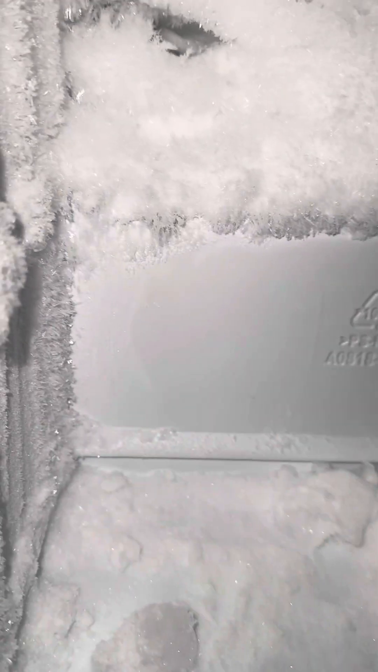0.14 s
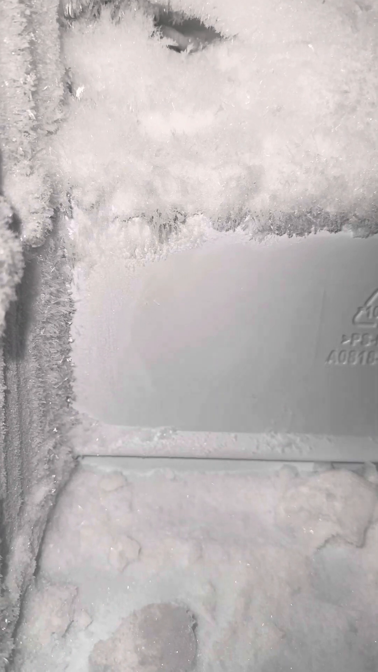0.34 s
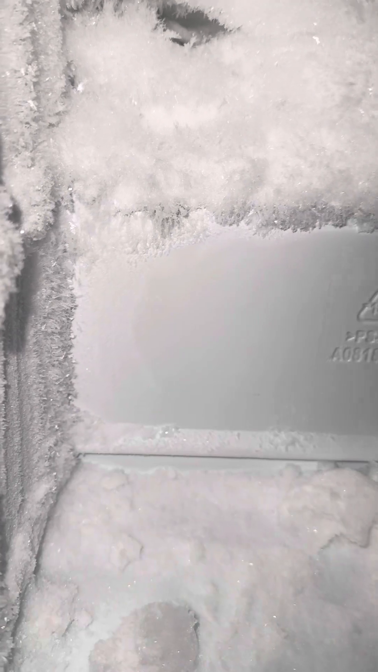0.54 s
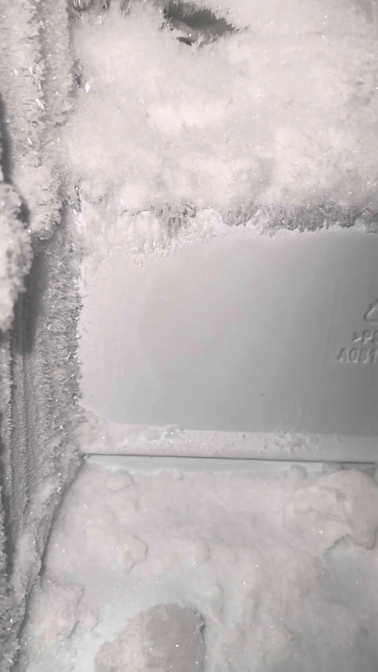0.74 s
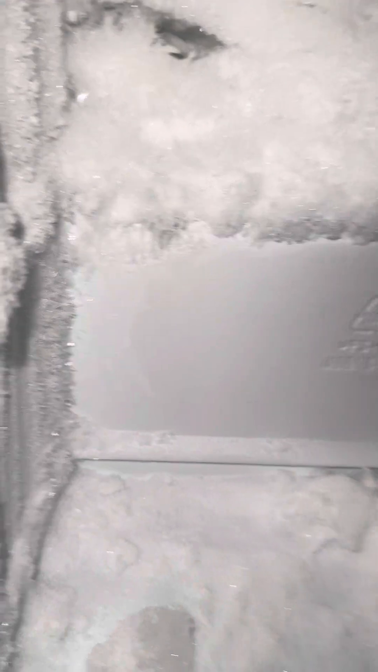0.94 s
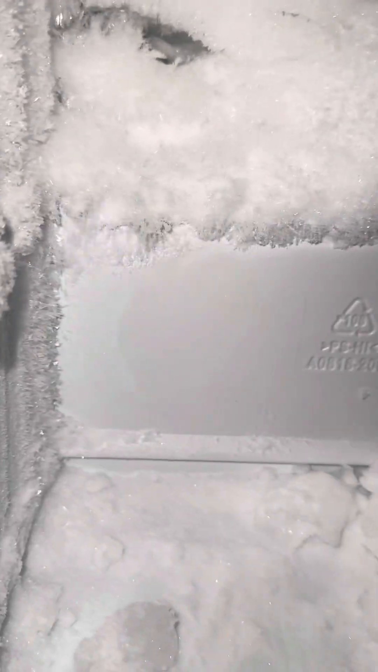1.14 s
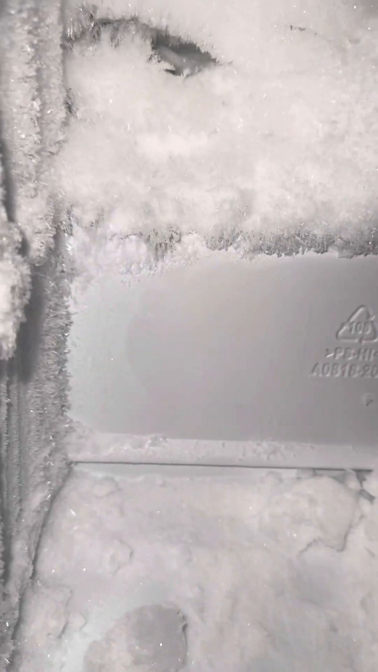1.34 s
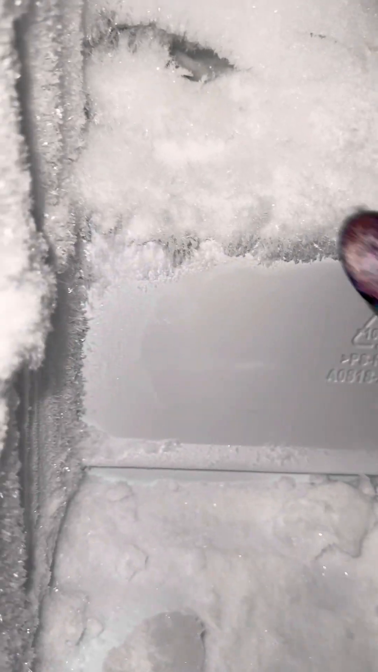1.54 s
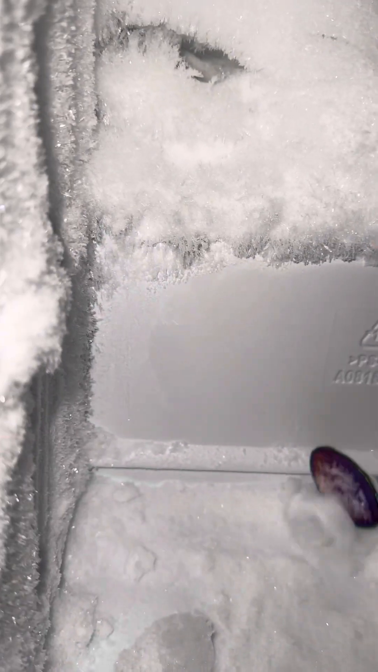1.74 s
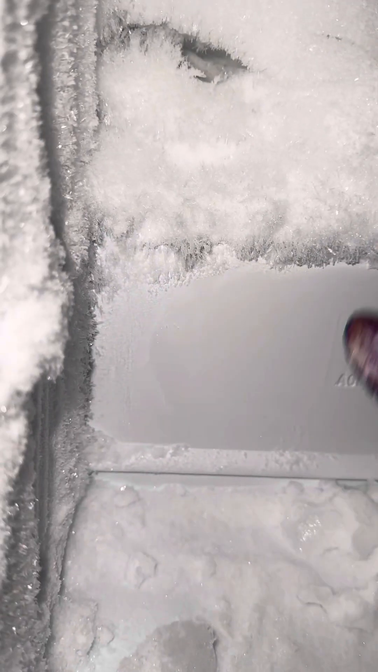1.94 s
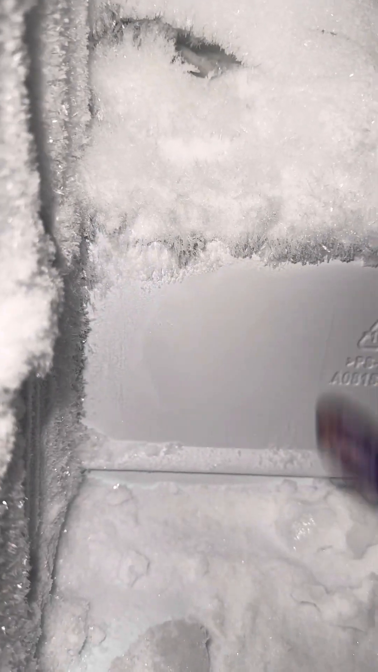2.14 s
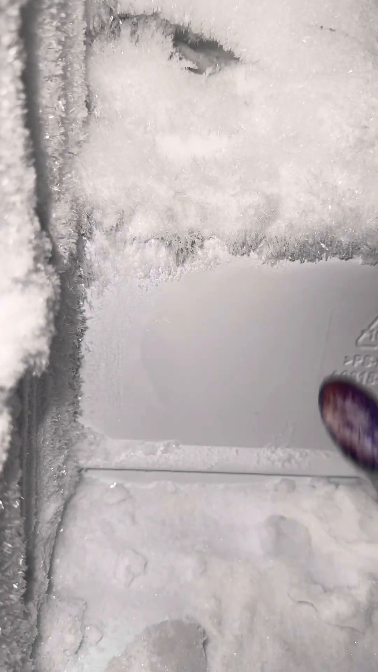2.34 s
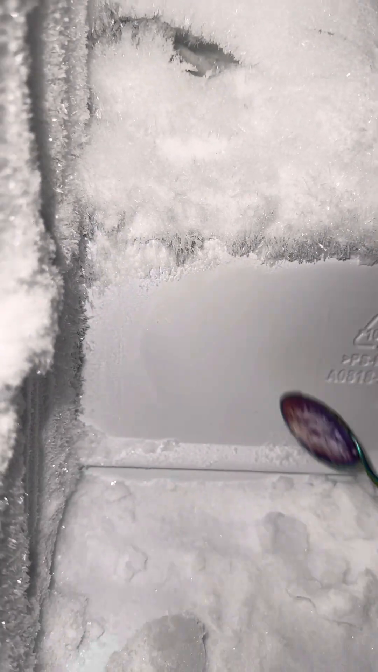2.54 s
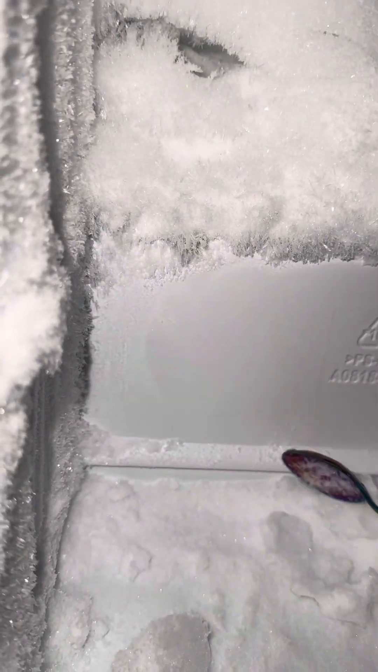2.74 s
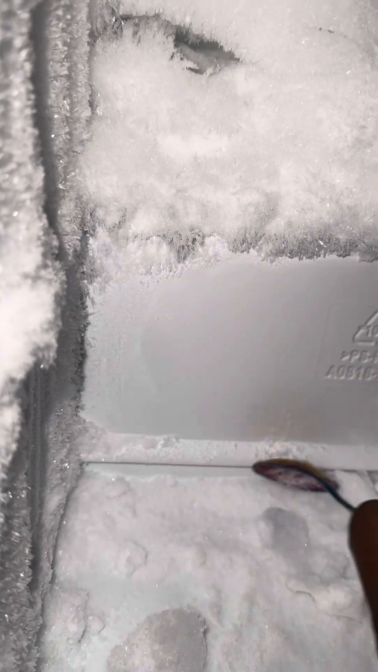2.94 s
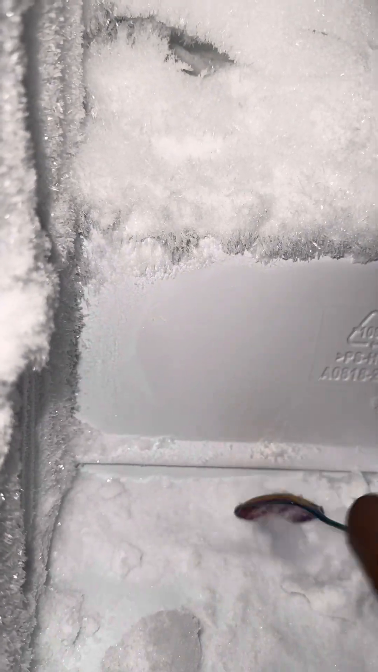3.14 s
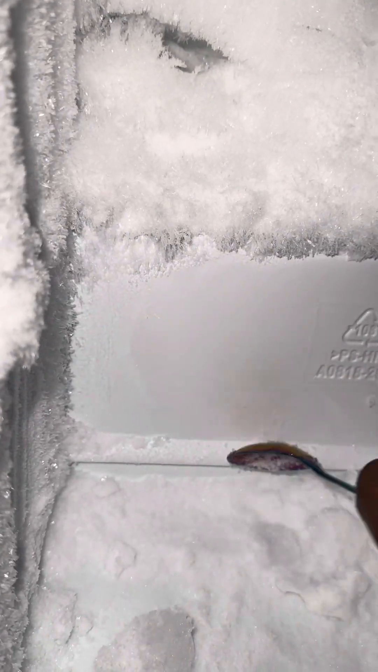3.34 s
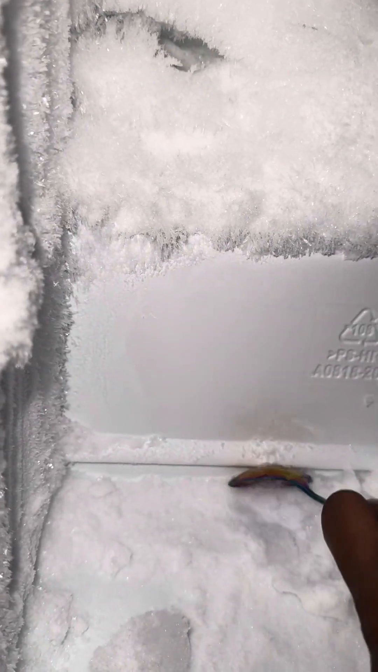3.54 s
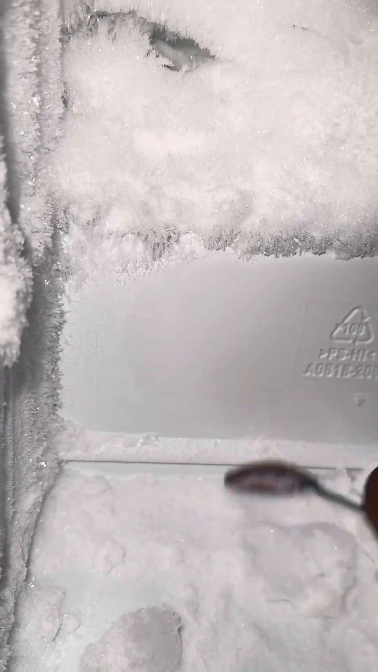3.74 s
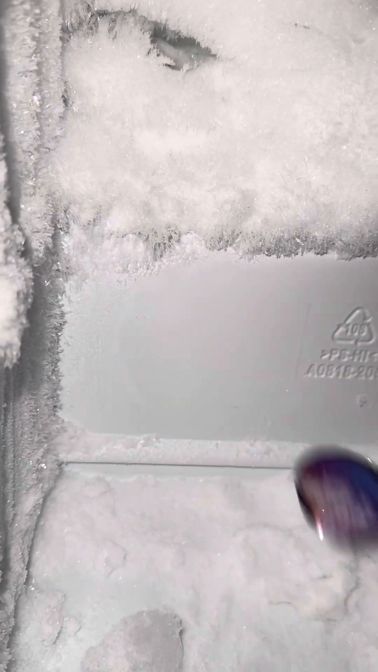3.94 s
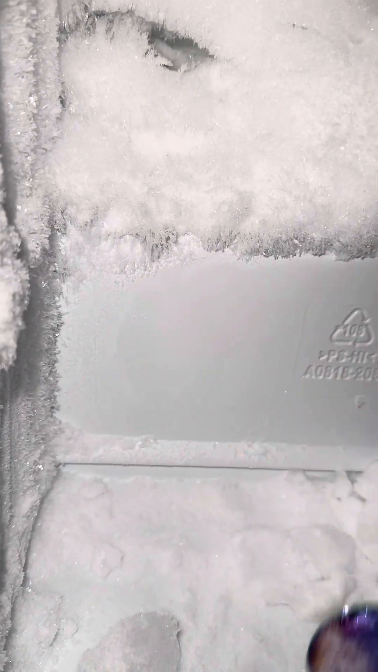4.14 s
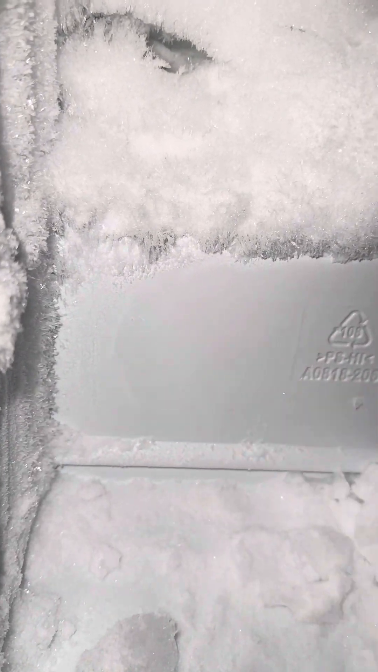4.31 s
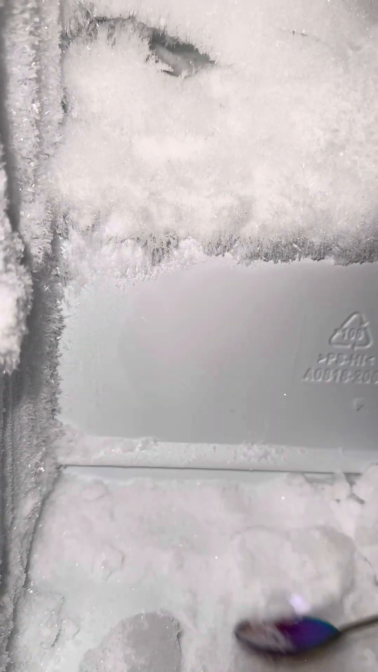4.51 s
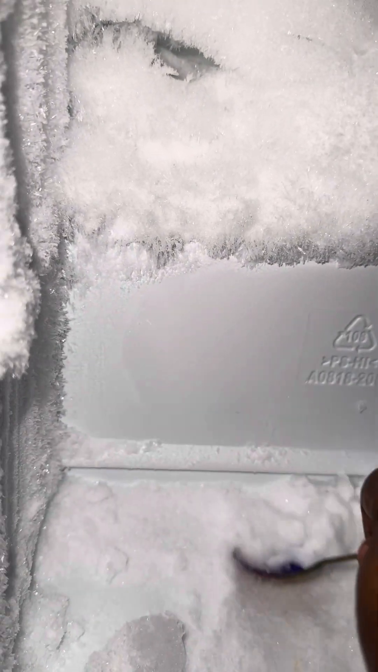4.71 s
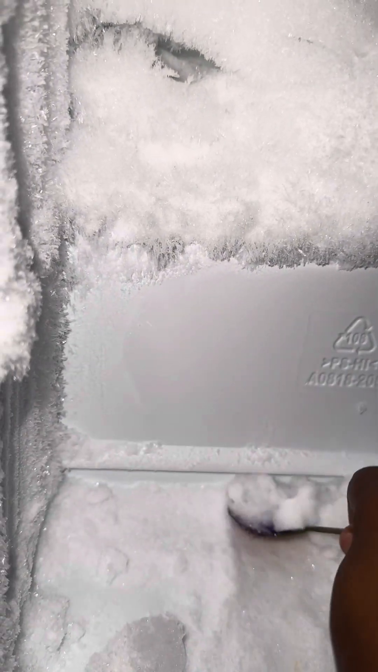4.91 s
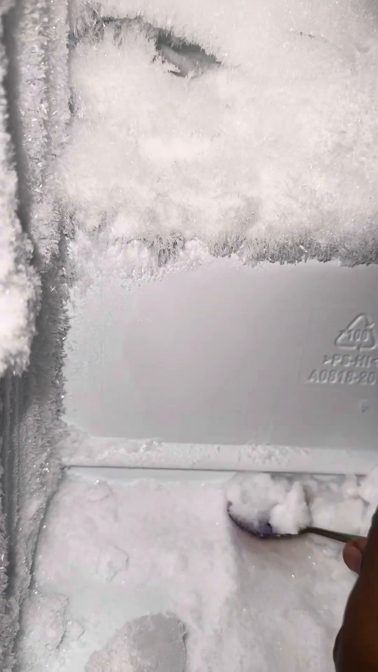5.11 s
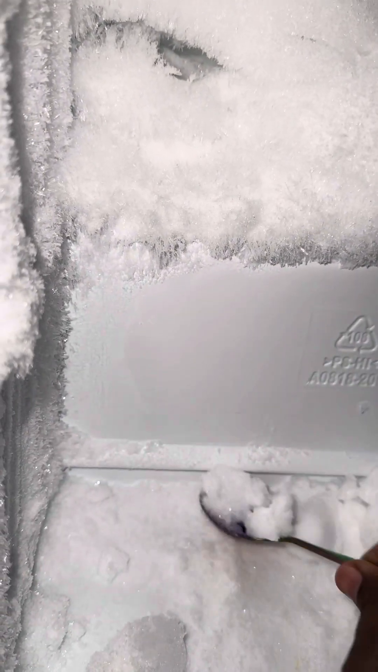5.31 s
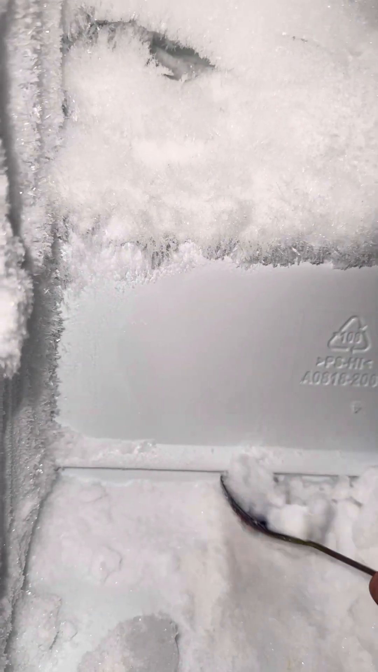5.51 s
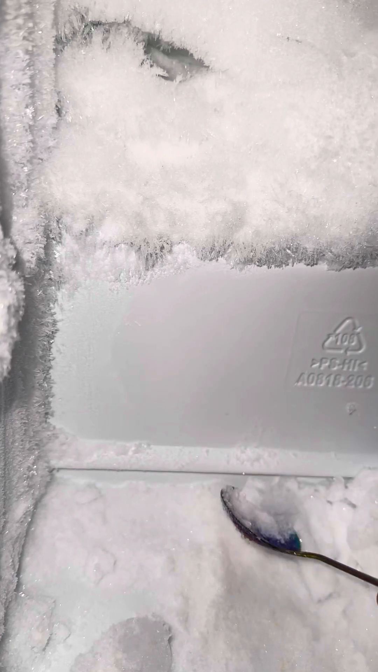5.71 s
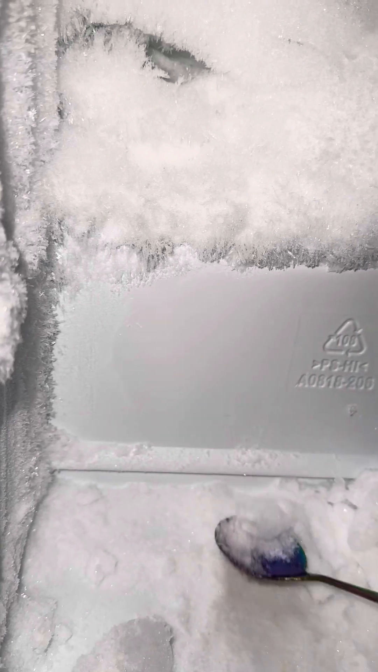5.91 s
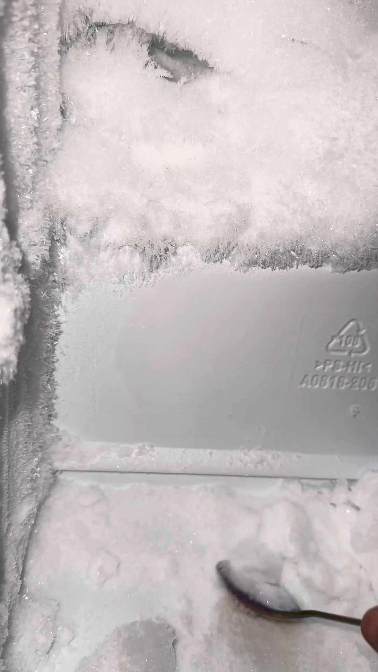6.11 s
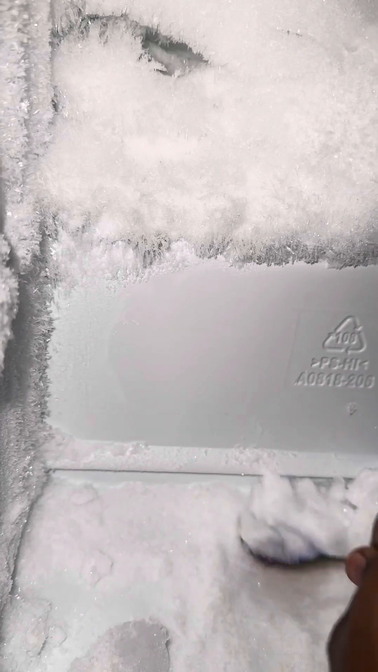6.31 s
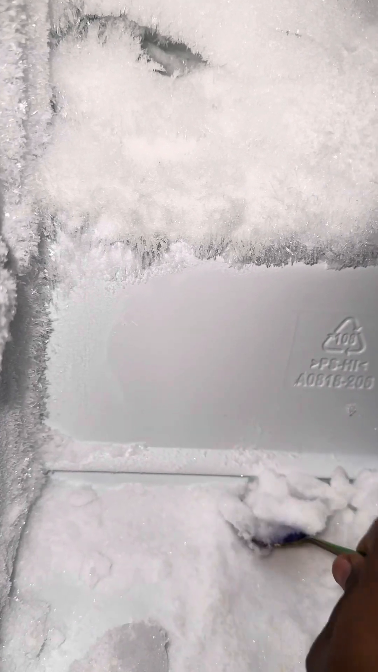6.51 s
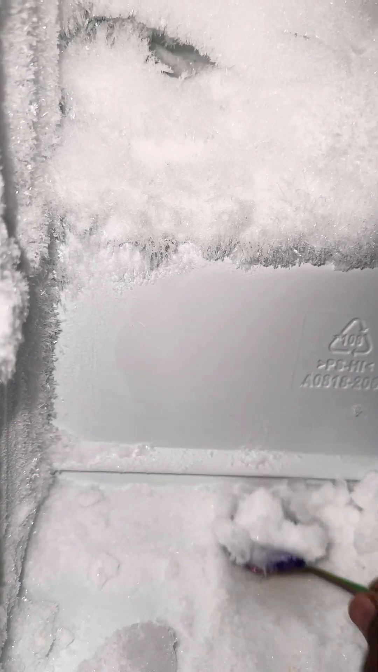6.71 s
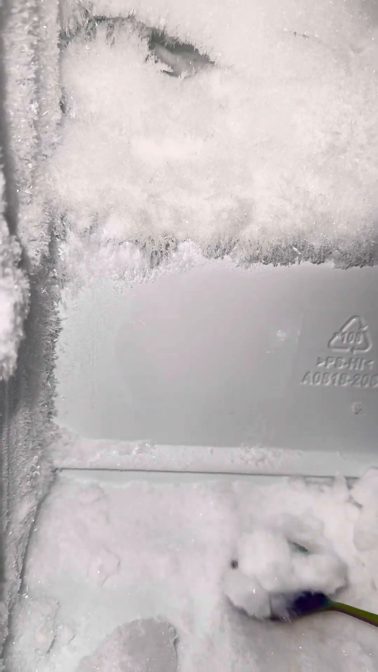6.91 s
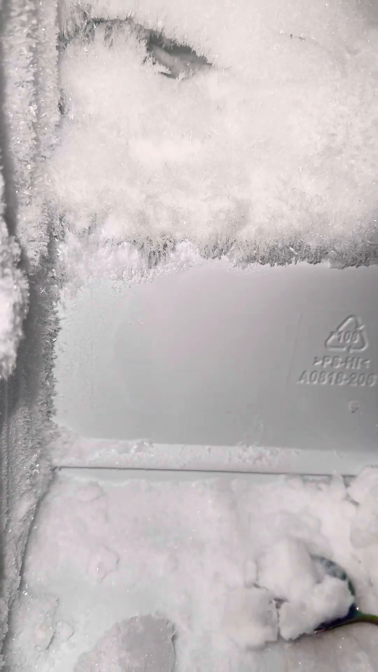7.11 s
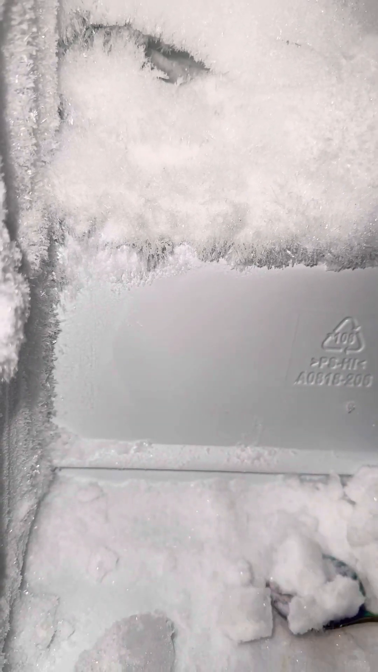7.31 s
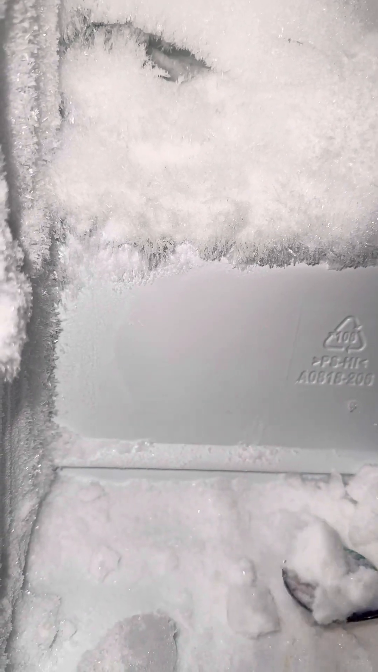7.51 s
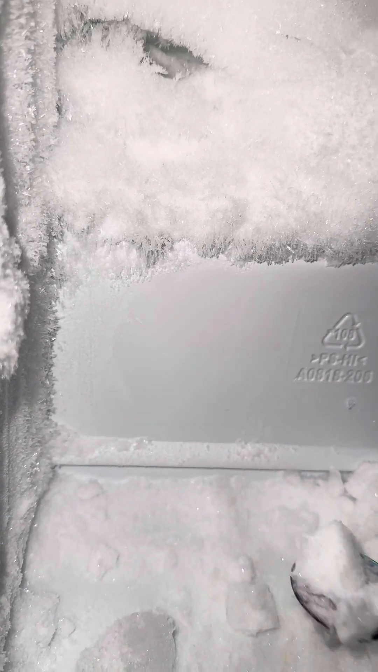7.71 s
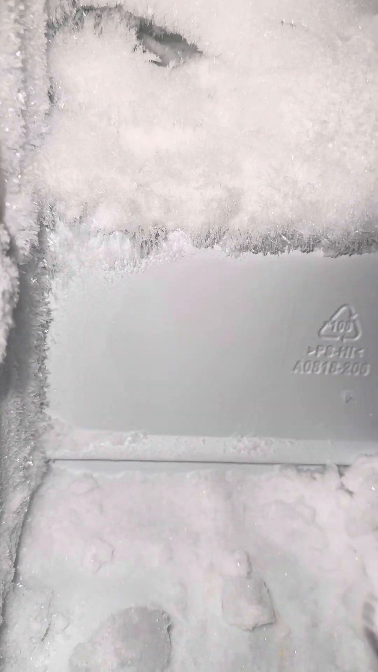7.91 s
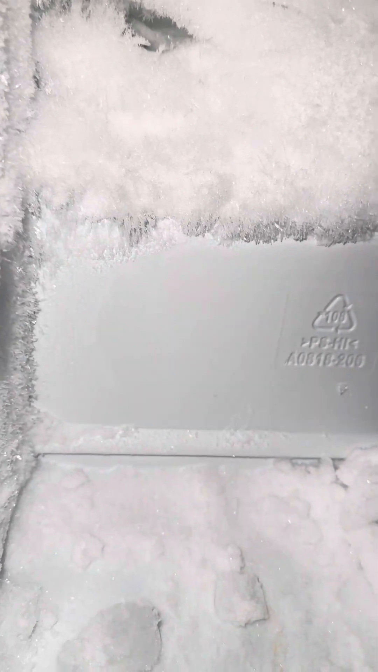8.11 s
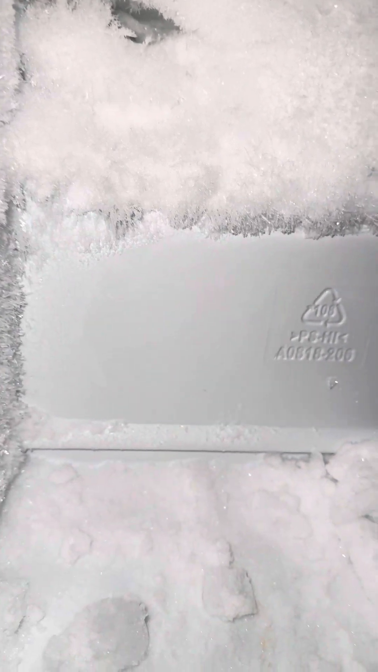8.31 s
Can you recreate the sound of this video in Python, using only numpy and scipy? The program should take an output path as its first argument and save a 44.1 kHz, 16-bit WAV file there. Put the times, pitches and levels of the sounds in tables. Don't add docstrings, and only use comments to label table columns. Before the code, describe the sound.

A metal spoon knocks hard twice on freezer frost, then rakes, stabs and scoops crunching ice over a low pulsing compressor hum.

```python
import sys
import numpy as np
from scipy import signal
from scipy.fft import rfft, irfft, next_fast_len
from scipy.io import wavfile
from scipy.ndimage import uniform_filter1d

SR = 44100
rng = np.random.default_rng(int(sys.argv[2]) if len(sys.argv) > 2 else 0)


def natural_amplitude(level_db):
    exponent = np.asarray(level_db, float) / 20
    return 10 ** exponent


def master_out(mix):
    frames = np.transpose(np.atleast_2d(mix))
    ceiling = np.clip(frames, -1, 1)
    pcm = np.round(ceiling * 32767).astype(np.int16)
    wavfile.write(sys.argv[1], SR, pcm)


N = 372777

# (multiple of shaft speed, level [dB rms])
ORDERS = [(1, -45), (3, -62), (6, -91.5), (7, -83.5), (8, -67), (9, -69), (10, -73), (12, -70.5), (14, -85),
          (16, -85.5), (33, -78)]
# (frequency [Hz], level [dB rms])
DOUBLES = [(118.26, -63.5), (119.04, -64), (120.0, -60)]
# (frequency [Hz], level [dB])
HISS_COLOUR = [(30, -15.5), (80, 22), (130, 15.5), (260, 7), (500, 4.5), (900, 0.5), (1600, -0.5),
               (2100, 3), (2900, -1), (3400, -7), (4200, -3), (6000, -7), (7000, -21), (9500, -34)]
# (frequency [Hz], level [dB])
HISS_PORTS = [(100, -18.5), (300, -6.5), (500, 0.5), (850, 6), (1300, -10), (1800, -19.5), (2700, -2.5),
              (3700, -8), (5000, -4.5), (6000, -8.5), (7000, -4), (9500, 2.5)]

# (frequency [Hz], level [dB])
PORTS = [(110, -37), (200, -28.5), (400, -8), (850, -14), (1300, -5.5), (1800, -16.5), (2700, 0),
         (3700, -9.5), (5100, 1.5), (6000, -5), (7500, -2.5), (10000, 3), (15000, 5)]
# (frequency [Hz], level [dB])
CENTRE_TREBLE = [(8000, -1.5), (9400, -2), (11500, -11.5), (13400, -6), (14500, 5)]
# (frequency [Hz], turn [rad])
TURN = [(300, -2.3), (650, -3.), (1000, -2.6), (1450, -3.6), (2000, -.6), (2700, -.6), (3500, -2.2),
        (5500, -1.8), (7000, -1.55)]
# (frequency [Hz], share [0-1])
APART = [(300, .8), (1000, 0.99), (1500, 0.87), (3500, .9), (5800, .92), (7000, .35), (9500, 0.39),
         (11000, 0.83)]

# (time [s], peak [dB], ring [Hz], length [ms])
TICKS = [(0.258, -43.5, 4100, 2.3), (0.284, -47.5, 2680, 4), (.352, -49, 2510, 1.4),
         (0.821, -48, 4090, 1.7), (1.163, -46, 4770, 1.5), (1.62, -42.5, 2090, 1.9),
         (8.157, -55, 1800, 2.6), (8.047, -43, 4100, 4), (8.136, -54.5, 4080, 1.7), (8.191, -53, 5650, 2.5),
         (1.093, -27, 4500, 2.5)]
# (frequency [Hz], t60 [s])
KITCHEN_DECAY = [(1000, .3), (3200, 0.42), (6000, 0.22), (12000, 0.17)]
# (time [s], peak [dB], length [ms])
LATCH = [
    (1.082, -40, 2.4),
    (1.0898, -27, 1.3),
    (1.0945, -16.5, 0.69),
    (1.0985, -22.5, 1),
]
# (frequency [Hz], width [Hz], level [dB])
LATCH_MODES = [(1500, 180, -14), (2120, 210, -11), (3200, 160, -11), (3570, 270, 4), (3880, 270, 2),
               (4700, 210, -1), (5700, 230, -1), (5730, 270, -12), (7770, 360, -13),
               (13500, 150, -10), (15100, 500, -14)]
# (time [s], peak [dB], length [ms])
CATCH = [
    (8.0549, -20.5, 0.23),
    (8.058, -34, 1.2),
]
# (frequency [Hz], width [Hz], level [dB])
CATCH_MODES = [(1350, 89, -13), (1670, 140, -7), (2090, 200, -2.5), (2720, 97, 1.5), (3280, 150, -8),
               (3800, 430, -3.5), (4730, 140, -21.5), (5630, 140, -4.5), (7400, 270, -32)]

# (frequency [Hz], level [dB])
FROST = [(65, -51), (110, -16), (194, -2.5), (301, -14.5), (601, -4.5), (1180, -7), (1790, -11), (2700, -7),
         (3200, -10.5), (5210, -13), (7920, -10), (11000, -17), (15600, -23.5), (16100, -83)]
# (frequency [Hz], width [Hz], level [dB])
BODY = [(214, 79, -8), (383, 22, 5), (563, 56, 2.5), (680, 68, 3), (900, 30, -9), (1200, 76, 4),
        (1520, 240, 3.5), (2090, 90, -0.5), (2300, 83, 6), (2674, 40, 3), (3720, 97, -2), (4260, 62, 1.5),
        (6530, 490, -7.5)]
# (frequency [Hz], level [dB], t60 [s])
PLATE = [(212.4, 13.5, 0.031), (280, 5, 0.035), (151, -9.5, 0.048), (400, -7, 0.051), (94, -13.5, 0.087),
         (189.7, -11.5, 0.12)]
# (frequency [Hz], t60 [s])
CABINET_DECAY = [(150, 0.17), (500, 0.32), (2000, 0.16), (8000, 0.14)]

# (time [s], peak [dB], ring [Hz], fizz [dB re peak])
CRACKS = [(2.935, -25.5, 2070, -32), (2.959, -20, 680, -7), (3.093, -21, 650, -1), (5.074, -36, 2600, -7),
          (4.298, -36.5, 600, 14), (4.341, -20, 1240, -11), (5.288, -46, 2900, -2),
          (4.6855, -18.5, 1280, -16), (4.743, -25, 1240, -2), (4.78, -18.5, 2400, -7),
          (5.165, -34.5, 700, -22), (5.369, -42.5, 675, -0.5), (5.465, -44, 484, 1),
          (5.030, -38, 2300, -15), (5.596, -31.5, 726, -27), (5.741, -41, 540, -23),
          (5.971, -29.5, 950, -22), (6.218, -29, 507, -2), (6.656, -36, 1290, -1), (6.722, -31, 1300, -5),
          (5.099, -41, 2770, -11), (6.705, -41.5, 1270, 3), (6.749, -45, 1200, 3), (5.266, -44.5, 900, 2.5),
          (7.091, -42.5, 700, 0.5), (7.297, -39, 690, -11), (7.349, -43, 750, -28)]
# (time [s], peak [dB], ring [Hz], fizz [dB re peak], thud [dB re peak])
KNOCKS = [(.29, -55.5, 394, -27, 13), (1.706, -37, 1000, -17.5, -21), (1.7137, -30.5, 1514, 5.5, -36),
          (1.7161, -4.5, 1170, -22, -18), (1.7174, -9, 520, -30.5, -29.5), (1.7205, -20, 1450, -22, 16.5),
          (1.738, -38, 1500, 1.5, -27), (1.816, -28.5, 1248, -6.5, -7), (2.155, -37, 2444, -3.5, -22),
          (2.1594, -8, 1220, -4, -21), (2.1626, -12, 703, -20.5, -8), (2.171, -26.5, 557, -30, 6),
          (2.212, -28.5, 1180, -13, -14), (4.926, -17, 430, -16, -12), (3.1185, -8, 2100, -14, -14.5),
          (3.564, -18.5, 666, 2, -16.5), (6.977, -32, 2200, -4.5, 0.1), (6.0165, -20, 535, -12, 1),
          (6.0727, -24.5, 527, 1, 1.5)]
# (time [s], peak [dB], ring [Hz], fizz [dB re peak])
LUMPS = [(0.844, -42, 533, -33), (2.299, -30, 2300, -3), (2.352, -40.5, 2390, -10), (2.766, -40, 1200, -1),
         (2.807, -30, 1350, -13), (3.648, -14.5, 1260, -14), (4.109, -47, 1670, -39),
         (4.182, -46, 1280, -13), (7.487, -39.5, 706, -18), (5.14, -39, 672, -24), (5.525, -32, 564, -7),
         (5.625, -32.5, 1230, 2.5), (5.84, -36, 1240, -19), (5.944, -34, 600, -17), (6.78, -48, 587, 12),
         (6.881, -43, 616, -23), (7.426, -35, 900, -6), (7.462, -38, 400, -6)]
# (time [s], peak [dB], ring [Hz], fizz [dB re peak], length [ms])
CLUMPS = [(2.846, -33.5, 1450, -17, 3), (2.888, -42, 860, -10, 4.6), (2.914, -37, 1410, -4, 3.1),
          (2.96, -28, 2400, -12, 5.8), (2.993, -23.5, 615, -19, 2.1), (3.529, -37, 2020, -18, 2.9),
          (3.483, -17.5, 634, -27, 2.3), (3.563, -17.5, 2260, -19, 3.6), (3.59, -21, 1180, -1, 1.8),
          (3.629, -20, 1250, -7, 1.7), (3.657, -17, 710, -18, 3.1), (4.364, -26, 1120, -14, 1.2),
          (4.431, -34, 1920, -10, 2.9), (4.452, -30, 1570, -5, 3.8), (4.468, -25, 2180, -1, 1.5),
          (4.532, -27.5, 2180, 3, 2.5), (4.617, -21.5, 1600, -4, 2.9), (4.662, -21, 1590, -4, 1.9),
          (4.671, -21, 1630, -2, 0.95), (4.708, -30, 696, -12, 2.3), (4.788, -30, 2980, -12, 1.3),
          (4.831, -19.5, 1180, -19, 2.8),
          (6.262, -25, 590, -0.5, 5.2), (6.304, -24, 1160, -5, 2.3), (6.343, -20, 1270, -12, 5.4),
               (6.362, -13.5, 1300, -9, 1.7), (6.345, -20.5, 715, -25, 6.8), (6.413, -19.5, 2650, -12, 2.7),
               (6.468, -26, 2240, -14, 3.7), (6.036, -38, 1700, 7, 1.5), (5.565, -40.5, 2400, 4.5, 0.72),
               (5.817, -51, 1600, -11, 2.1), (7.118, -37.5, 2040, 1, 1.8), (7.9, -45, 2500, -12, 1.6),
               (4.4, -39, 2900, -10, 3), (5.1, -47, 1800, 6, 5.2), (6.011, -21, 1800, 1.5, 4.3),
               (6.064, -24.5, 1930, 0, 4), (6.505, -28, 610, -26, 5), (6.979, -33, 450, -27, 2.4),
               (7.275, -47, 700, -20, 9.5), (4.7, -36, 2400, -6, 3.8), (6.742, -37, 2700, 3, 1.6),
               (6.782, -40, 1800, -5, 0.75), (6.325, -16, 1200, -10, 3.1), (4.598, -18, 1500, -6, 2.5)]
# (time [s], peak [dB], ring [Hz], fizz [dB re peak])
SNAPS = [(1.717, -24, 2300, 7), (2.1588, -20.5, 2700, 1.5), (2.1612, -10, 1000, -1.5),
         (2.167, -7.5, 2240, 1), (1.8168, -23, 2200, -5), (3.83, -53, 3000, -22.5),
         (3.9065, -50.5, 3600, -16.5), (3.94, -50, 3300, -17), (4.039, -50, 2200, -19),
         (4.072, -54, 1800, -22), (4.13, -43.5, 3000, -22), (4.2035, -45, 4000, -22),
         (2.63, -51, 3400, -24), (2.5, -49.5, 1114, -10)]

# (start [s], rise [s], hold [s], 20 dB fade [s], crunch [dB])
REACH = [
    (1.01, 0.021, 0.041, .015, -79.5),
    (1.1, .01, 0.029, 0.063, -70),
]
# (start [s], rise [s], hold [s], 20 dB fade [s], crunch [dB])
SPRAY = [
    (1.722, 0.00088, .001, 0.0523, -17),
    (1.73, 0.0068, 0.0009, 0.28, -43),
    (1.816, .004, 0.0012, 0.04, -39),
]
# (start [s], rise [s], hold [s], 20 dB fade [s], crunch [dB])
BOUNCE = [
    (2.168, 0.00072, 0.00091, 0.0077, -16),
    (2.172, 0.0041, 0.0011, 0.091, -28),
    (2.26, 0.037, .001, 0.043, -42.5),
    (2.31, 0.0059, .001, 0.14, -51),
]
# (start [s], rise [s], hold [s], 20 dB fade [s], crunch [dB])
NUDGE = [
    (2.755, 0.063, .001, 0.087, -40),
    (2.8, 0.026, 0.14, 0.029, -42.5),
]
# (start [s], rise [s], hold [s], 20 dB fade [s], crunch [dB])
RAKE = [
    (2.95, 0.013, .001, 0.066, -18),
    (3.015, 0.029, 0.027, 0.01, -28.5),
    (3.082, 0.018, 0.0097, 0.03, -19.5),
    (3.122, 0.0056, 0.023, 0.02, -22),
    (3.17, 0.025, .001, 0.14, -45),
]
# (start [s], rise [s], hold [s], 20 dB fade [s], crunch [dB])
STAB = [
    (3.411, 0.0028, 0.034, 0.055, -42),
    (3.44, 0.047, 0.011, 0.0089, -22.5),
    (3.51, 0.01, 0.046, 0.034, -44),
    (3.558, 0.0054, 0.09, 0.037, -19.5),
    (3.68, 0.035, .001, 0.23, -50.5),
]
# (start [s], rise [s], hold [s], 20 dB fade [s], crunch [dB])
SCOOP = [(4.288, 0.015, 0.031, 0.097, -32.5), (4.31, 0.038, 0.013, 0.059, -27),
         (4.38, 0.045, 0.073, 0.05, -34), (4.44, 0.022, 0.036, 0.1, -31),
         (4.525, 0.016, 0.032, 0.056, -28.5), (4.565, 0.027, 0.035, 0.095, -24.5),
         (4.65, 0.017, 0.016, 0.036, -34.5), (4.685, 0.0027, 0.011, 0.079, -28.5),
         (4.742, .006, 0.022, 0.044, -30.5), (4.775, 0.0076, 0.0089, 0.031, -21.5),
         (4.805, 0.0077, 0.041, 0.085, -30.5), (4.86, 0.033, 0.029, 0.027, -29.5)]
# (start [s], rise [s], hold [s], 20 dB fade [s], crunch [dB])
SETTLE = [
    (4.94, 0.0087, 0.16, 0.07, -42),
    (5.135, 0.029, 0.031, 0.022, -41),
    (5.205, .012, 0.039, .06, -49.5),
    (5.25, 0.024, 0.022, 0.037, -46.5),
]
# (start [s], rise [s], hold [s], 20 dB fade [s], crunch [dB])
DRAG = [
    (5.43, 0.091, .001, 0.05, -43),
    (5.553, 0.016, 0.055, 0.15, -43.5),
    (5.67, 0.16, 0.011, 0.5, -47.5),
    (5.94, 0.044, 0.0006, 0.02, -30.5),
    (6.008, 0.016, 0.00074, 0.011, -25.5),
    (6.056, 0.011, .001, 0.47, -34.5),
    (5.84, 0.0089, 0.018, 0.027, -48.5),
]
# (start [s], rise [s], hold [s], 20 dB fade [s], crunch [dB])
PLOUGH = [
    (6.12, 0.18, 0.03, 0.2, -31.5),
    (6.28, 0.05, 0.03, 0.081, -24.5),
    (6.375, 0.018, 0.045, 0.047, -27),
    (6.44, 0.028, 0.036, 0.01, -28),
    (6.53, 0.0077, 0.075, 0.011, -48),
]
# (start [s], rise [s], hold [s], 20 dB fade [s], crunch [dB])
LIFT = [
    (6.64, .014, 0.048, 0.052, -58),
    (6.67, 0.14, 0.0012, 0.029, -42.5),
    (6.86, 0.091, .001, 0.19, -53),
    (6.965, 0.014, .001, 0.2, -46),
    (7.07, 0.063, .001, 0.026, -46.5),
    (7.14, 0.014, 0.00093, 0.17, -52.5),
    (7.24, 0.043, .001, 0.091, -46.5),
    (7.32, 0.034, 0.16, .07, -51.5),
]
# (pushes, shelf thud [dB], bite [dB], edge [dB], fizz [dB]), all re crunch
GESTURES = [(REACH, -10, 0.1, 0.1, 12), (SPRAY, 2.1, -0.5, -7.5, -16), (BOUNCE, -5.5, -1.1, -2, -13.5),
            (NUDGE, -9.5, 2.4, -2.6, -12), (RAKE, -11.5, .1, 0.1, -15), (STAB, -8.5, .1, 0.013, -11),
            (SCOOP, -7.5, .1, 0.76, -6.5), (SETTLE, -8, 1.2, 1.1, -14.5), (DRAG, -6, 0.71, -3.6, -11),
            (PLOUGH, -11, 0.64, -1.7, -9), (LIFT, -9, -2, -3, -14.5)]

# (time [s], peak [dB], length [ms])
SKIPS = [
    (3.413, -18, 3.5),
    (3.421, -24, 1.5),
    (3.429, -21, 3),
    (3.442, -28, 3.5),
    (3.453, -26, 1.5),
]
# (frequency [Hz], width [Hz], level [dB])
BOWL = [(1180, 140, 1.5), (1560, 88, 2.5), (2780, 130, -3.5), (3700, 110, -15), (5770, 220, -25)]
# (frequency [Hz], threshold [standard deviations])
SURVIVES = [(4800, 4), (5100, .5), (5300, .3), (5650, 2.8), (8500, 2.2), (9800, .1), (10600, -2.1),
            (13300, -2.2), (14300, -.8), (15500, .3)]

MEDIUM_DB = -40


def evened(x):
    return x / np.sqrt(np.mean(x ** 2) + 1e-20)


def read(points, hz):
    f, value = np.transpose(points)
    return np.interp(np.log(hz + 1), np.log(f + 1), value)


def shape(x, gain):
    size = next_fast_len(x.shape[-1] + 4096)
    spectrum = rfft(x, size) * gain(np.fft.rfftfreq(size, 1 / SR))
    return irfft(spectrum, size)[..., :x.shape[-1]]


def band(x, lo_hz, hi_hz):
    edges = np.minimum([lo_hz, hi_hz], [SR / 3, SR / 2.2])
    return signal.sosfilt(signal.butter(3, edges, "bandpass", fs=SR, output="sos"), x)


def drift(rate_hz):
    return evened(shape(rng.standard_normal(N), lambda hz: np.exp(-(hz / rate_hz) ** 2)))


def patchy(x, depth_db, bins, frames):
    z = signal.stft(x, SR, nperseg=256, noverlap=192)[2]
    field = rng.standard_normal(z.shape[-2:])
    for _ in range(2):
        field = uniform_filter1d(uniform_filter1d(field, bins, 0), frames, 1)
    z = z * natural_amplitude(depth_db * evened(field))
    return signal.istft(z, nperseg=256, noverlap=192)[1][..., :N]


def tail(seconds, decays):
    count = round(seconds * SR)
    taps = rng.standard_normal(count) * (rng.random(count) < .06)
    hz, t, z = signal.stft(taps, SR, nperseg=128)
    fade = natural_amplitude(-60 * t / read(decays, hz)[:, None])
    taps = signal.istft(z * fade, SR, nperseg=128)[1]
    return taps / np.linalg.norm(taps)


def ports(near, apart, side_db, shares):
    def share(hz):
        return np.clip(read(shares, hz), 0, 1)

    def related(hz):
        return np.exp(1j * read(TURN, hz)) * np.sqrt(1 - share(hz)) * natural_amplitude(read(side_db, hz))

    side = shape(near, related)
    side += shape(apart, lambda hz: np.sqrt(share(hz)) * natural_amplitude(read(side_db, hz)))
    both = shape(near, lambda hz: natural_amplitude(read(CENTRE_TREBLE, hz)))
    return np.array([both + side, both - side])


def struck(hits, modes):
    t, out = np.arange(3000) / SR, np.zeros(N + 3000)
    body = sum(natural_amplitude(db) * width * np.exp(-np.pi * width * t) * np.sin(2 * np.pi * hz * t)
               for hz, width, db in modes)
    for (s, db, ms), noise in zip(hits, rng.standard_normal((len(hits), 3000))):
        burst = noise * t * np.exp(-t / (ms / 1000))
        rings = signal.oaconvolve(burst, body)[:3000]
        out[round(s * SR):][:3000] += natural_amplitude(db) * rings / abs(rings).max()
    return out[:N]


def motors():
    shaft_hz, beat_s, fan_motor_db = 59.12, 2.5, -41
    quiet_s, together_s = 1.7366, .2
    clock = np.arange(N) / SR
    t = clock - quiet_s
    out = -natural_amplitude(fan_motor_db) * np.cos(2 * np.pi * (shaft_hz + 1 / beat_s) * t)
    for k, db in ORDERS:
        upper = k > 1
        level = natural_amplitude(db + upper * 1.2 * drift(3.7))
        out += level * np.cos(2 * np.pi * k * shaft_hz * t + upper * 6 * rng.random())
    buzz = sum(natural_amplitude(db) * np.cos(2 * np.pi * hz * (clock - together_s)) for hz, db in DOUBLES)
    return np.sqrt(2) * (out + natural_amplitude(1.0 * drift(3.)) * buzz)


def hiss():
    hiss_db, capsule_db = -62.5, -89
    air = patchy(rng.standard_normal((2, N)), 1.1, bins=3, frames=30)
    air = shape(air, lambda hz: natural_amplitude(read(HISS_COLOUR, hz)))
    air = natural_amplitude(hiss_db) * air / np.std(band(air[0], 720, 8100))
    capsule = natural_amplitude(capsule_db) * evened(band(rng.standard_normal(N), 7000, 15300))
    return ports(air[0], air[1], HISS_PORTS, [(1000, 0.99)]) + [[1], [-1]] * capsule


def ticks():
    partials = [(0.98, 11.5), (0.46, 1.0), (0.48, -13.5), (0.16, -8.5),
                (1.8, -8.5), (3.5, -28.0), (4.9, -30.0)]
    t, out = np.arange(3000) / SR, np.zeros(N + 3000)
    for (s, db, hz, ms), noise in zip(TICKS, rng.standard_normal((len(TICKS), 3000))):
        burst = noise * t * np.exp(-t / (ms / 1000))
        rings = sum(natural_amplitude(level_db) * band(burst, hz * k / 1.105, hz * k * 1.19)
                    for k, level_db in partials)
        out[round(s * SR):][:3000] += natural_amplitude(db) * rings / abs(rings).max()
    return out[:N]


def kitchen():
    clicks = ticks() + latches()
    near, apart = (clicks + natural_amplitude(-15.5) * signal.oaconvolve(clicks, tail(0.55, KITCHEN_DECAY))[:N]
                   for _ in range(2))
    return ports(near, apart, np.add(PORTS, [0, 7.0]), [(1000, .3)])


def causal(log_gain):
    circle = np.r_[log_gain, log_gain[-2:0:-1]]
    return np.fft.ifft(np.exp(circle - 1j * signal.hilbert(circle).imag)).real[:2048]


def spot(detune):
    hz = np.fft.rfftfreq(4096, 1 / SR)
    bumps = sum(natural_amplitude(2 * db) / (1 + (2 * (hz - f * d) / width) ** 2)
                for (f, width, db), d in zip(BODY, detune))
    frost = natural_amplitude(np.maximum(read(FROST, hz), -90))
    return causal(np.log(frost) + np.log(0.22 + bumps) / 2)


def shelf_plate(t):
    modes = sum((-1) ** k * natural_amplitude(db - 60 * t / t60) * np.sin(2 * np.pi * hz * t)
                for k, (hz, db, t60) in enumerate(PLATE))
    plate = modes * (1 - np.exp(-(t / 0.0078) ** 2))
    return plate / abs(plate).max()


def all_cracks():
    crack_thud_db, lump_thud_db = -32, -8.5
    lump_slope = -0.032
    crack_ms, knock_ms, lump_ms, snap_ms = 2.32, 1.5, 1.92, 0.63
    rows = [(*row, crack_thud_db, crack_ms) for row in CRACKS]
    rows += [(*row, knock_ms) for row in KNOCKS]
    for s, db, *rest in LUMPS:
        rows.append((s, db, *rest, lump_thud_db + lump_slope * (db - MEDIUM_DB), lump_ms))
    rows += [(*row, crack_thud_db, ms) for *row, ms in CLUMPS]
    rows += [(*row, crack_thud_db, snap_ms) for row in SNAPS]
    return rows


def cracks():
    rows = all_cracks()
    t, out = np.arange(8000) / SR, np.zeros(N + 8000)
    plate, colour = shelf_plate(t), spot(np.ones(len(BODY)))
    noises = rng.standard_normal((len(rows), 8000))
    for (s, db, hz, fizz_db, thud_db, ms), noise in zip(rows, noises):
        burst = noise * t ** 2 * np.exp(-t / (ms / 1600))
        wide = signal.oaconvolve(burst, colour)[:8000]
        peak = signal.iirpeak(hz, 3.0, SR)
        ring = signal.lfilter(*peak, signal.lfilter(*peak, burst))
        body = band(evened(ring) + 0.42 * evened(wide), 310, 4800)
        fizz = band(wide, 2400, 19000)
        sound = body / abs(body).max() + natural_amplitude(fizz_db) * fizz / abs(fizz).max() + natural_amplitude(thud_db) * plate
        out[round(s * SR):][:8000] += natural_amplitude(db) * sound
    return out[:N]


def crunch(per_s=7000., spread_db=2.5, clump_db=1.23):
    size_db = spread_db * np.minimum(rng.exponential(1, N), 5)
    size_db += clump_db * drift(56.0) + 2.0 * drift(130.0)
    snaps = natural_amplitude(size_db) * rng.choice([-1., 1.], N) * (rng.random(N) < per_s / SR)
    place = rng.integers(0, 6, N // 900 + 1).repeat(900)[:N]
    detunes = 1 + 0.046 * rng.standard_normal((6, len(BODY)))
    return sum(signal.oaconvolve(snaps * (place == k), spot(d))[:N] for k, d in enumerate(detunes))


def pressure(pushes):
    power = np.full(N, 1e-14)
    for start, rise, hold, fade, db in pushes:
        part = power[round(start * SR):][:SR]
        t = np.arange(len(part)) / SR
        swell = np.minimum(t / abs(rise), 1) ** 0.89
        fading = np.maximum(t - abs(rise) - abs(hold), 0) / abs(fade)
        part += (swell * natural_amplitude(db - 20 * fading)) ** 2
    return np.sqrt(power)


def strokes():
    thud_slope, fizz_slope = -0.24, -0.036
    ice, out = patchy(crunch(), 2.1, 3, 10), np.zeros(N)
    scale = np.std(band(ice, 300, 2800))
    thud = evened(band(ice, 130, 300))
    body = band(ice, 300, 900) / scale
    bite = band(ice, 900, 1800) / scale
    edge = band(ice, 1800, 3300) / scale
    fizz = band(ice, 3300, 17000) / np.std(band(ice, 2800, 9000))
    for pushes, thud_db, bite_db, edge_db, fizz_db in GESTURES:
        gain = pressure(pushes)
        hard = gain / natural_amplitude(MEDIUM_DB)
        sound = body + natural_amplitude(bite_db) * bite + natural_amplitude(edge_db) * edge
        sound += natural_amplitude(thud_db) * hard ** thud_slope * thud
        sound += natural_amplitude(fizz_db) * hard ** fizz_slope * fizz
        out += natural_amplitude(-2.5) * gain * sound
    return out


def latches():
    latch = band(struck(LATCH, LATCH_MODES), 1150, 16000)
    return latch + band(struck(CATCH, CATCH_MODES), 1300, 7500)


def skips():
    return struck(SKIPS, BOWL)


def scattered(x):
    turn = 2 * np.pi * (7 * np.arange(N) / SR + np.arange(3)[:, None] / 3)
    paths = rng.standard_normal((3, 600)) * np.exp(-np.arange(600) / 90)
    paths /= np.linalg.norm(paths, axis=1, keepdims=True)
    return signal.oaconvolve(x * np.sqrt(2 / 3) * np.cos(turn), paths, axes=1)[:, :N].sum(0)


def scene():
    spoon = strokes() + cracks() + skips()
    near = spoon + natural_amplitude(-14.5) * signal.oaconvolve(spoon, tail(.35, CABINET_DECAY))[:N]
    return ports(near, scattered(near), PORTS, APART) + kitchen() + motors() + hiss()


def dropouts(x):
    top_hz, sudden_top_hz = 15850, 16500
    middle_and_side = np.array([x[0] + x[1], x[0] - x[1]]) / 2
    hz, _, (mid, side) = signal.stft(middle_and_side, SR, nperseg=1024, noverlap=768)
    row_hz = hz[:, None]
    field = uniform_filter1d(rng.standard_normal(mid.shape), size=7, axis=0)
    field = uniform_filter1d(field, size=16, axis=1)
    column = uniform_filter1d(rng.standard_normal(mid.shape[1]), size=6)
    chance = .75 * evened(field) + .66 * evened(column) * (row_hz > 8000)
    treble = (abs(side[hz > 9000]) ** 2).sum(0)
    sudden = treble > 2.6 * uniform_filter1d(treble, size=17)
    islands = 1. * (chance < read(SURVIVES, hz)[:, None])
    keep = uniform_filter1d(islands, size=5, axis=0) > .5
    inside = (row_hz < top_hz) | sudden & (row_hz < sudden_top_hz)
    keep = (keep | sudden & (row_hz > 8000)) & inside
    kept = np.array([mid * keep, side * inside])
    mid, side = signal.istft(kept, nperseg=1024, noverlap=768)[1][:, :N]
    return np.array([mid + side, mid - side])


def top_cut(x):
    return signal.sosfilt(signal.butter(12, 16810, fs=SR, output="sos"), x)


def record(dry):
    low_cut_hz = 38
    mix = shape(np.clip(dry, -1, 1), lambda hz: 1 / (1 + (low_cut_hz / (hz + 1)) ** 6))
    mix = dropouts(mix)
    return top_cut(mix)


dry = scene()
out = record(dry)
master_out(out)
```